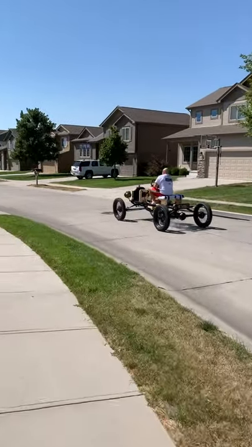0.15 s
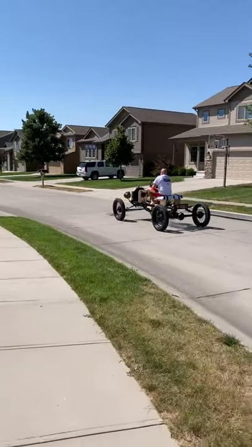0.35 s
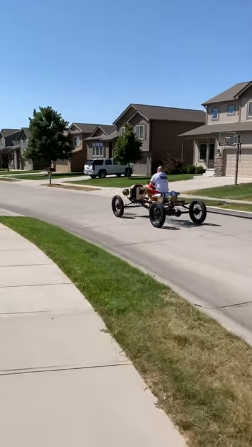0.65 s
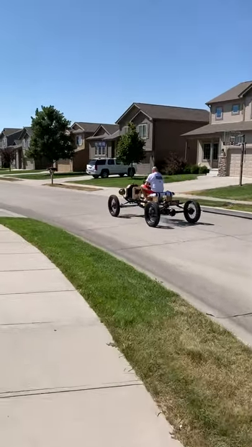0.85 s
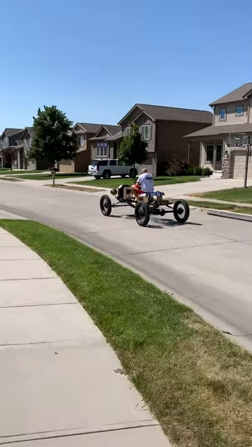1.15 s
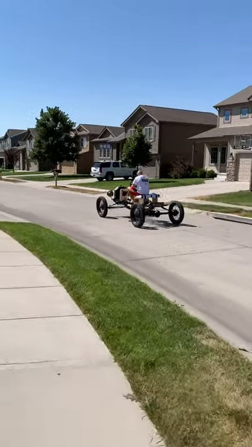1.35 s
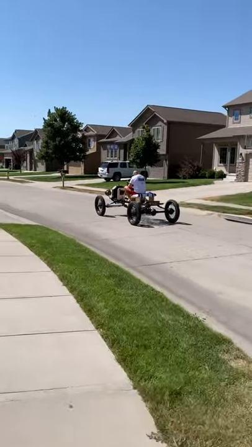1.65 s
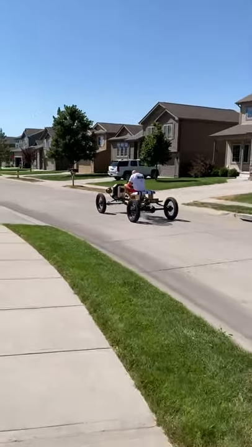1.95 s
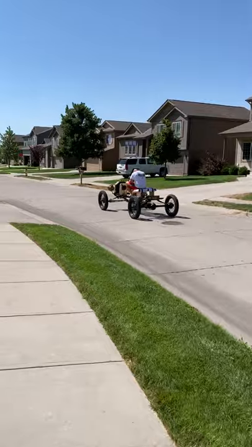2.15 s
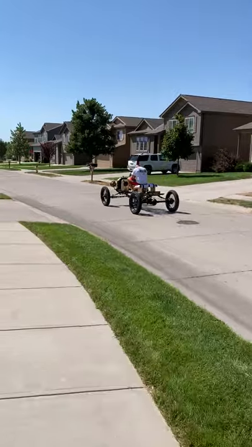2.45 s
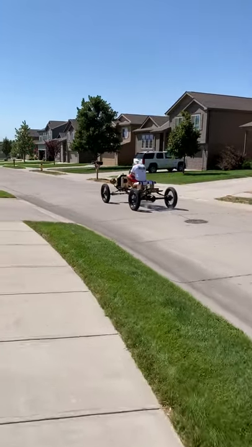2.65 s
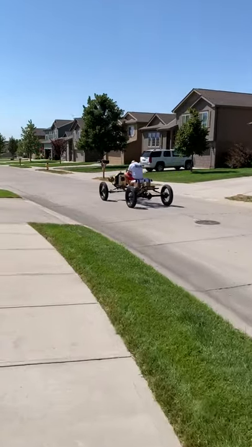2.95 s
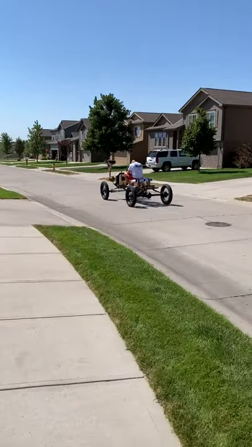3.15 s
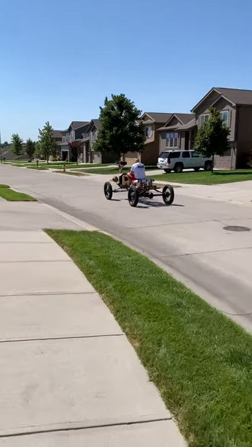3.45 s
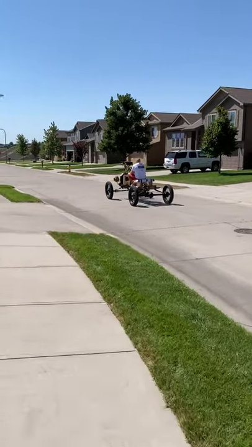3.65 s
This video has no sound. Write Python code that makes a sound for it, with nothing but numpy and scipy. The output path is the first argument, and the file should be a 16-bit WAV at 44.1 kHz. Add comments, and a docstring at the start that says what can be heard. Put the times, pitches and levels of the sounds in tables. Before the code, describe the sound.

From the start to about 3.8 seconds, a small steam car hisses in crisp, sizzling bursts roughly every 0.35 seconds, each sagging and closing abruptly. Quicker hollow, raspy exhaust chuffs run underneath, about six per second. Wind rumbles and thumps, strongest near 0.27, 1.3 and 2.2. Light knocks tap around 1.6, 2.0, 3.4 and 3.55; two faint hums swell near 2.15 and 3.0 over soft distant street noise.

```python
"""On a street pavement, a small steam car drives by the listener, heard through two close microphone ports.
Steam hisses out on every piston stroke: three bands of noise open, sag and shut together.
The exhaust chuffs about four times a turn: puffs of noise ring a pipe and rasp at its mouth.
Wind rumbles and thumps on the microphone as low noise and filtered pushes.
Behind lies a distant street of soft noise; a few light knocks and two faint hums are decaying or swelling tones."""
import sys
import numpy as np
from scipy import signal
from scipy.fft import rfft, irfft, next_fast_len
from scipy.io import wavfile
from scipy.ndimage import uniform_filter1d, map_coordinates

SR = 44100
rng = np.random.default_rng(int(sys.argv[2]) if len(sys.argv) > 2 else 0)


def dump_mix(stems):
    """Bounce the given channels to the path in sys.argv[1] as a 16-bit WAV at rate SR."""
    frames = np.atleast_2d(stems).T  # one column per channel
    limited = np.clip(frames, -1, 1)  # hard clip at full scale
    pcm = np.round(limited * 32767).astype(np.int16)
    wavfile.write(sys.argv[1], SR, pcm)


N = 167139  # length of the scene in samples


def amp(db):
    """Decibels turned into a plain multiplier."""
    return 10 ** (np.asarray(db) / 20)


def unit(x):
    """The same sound scaled to an rms of 1."""
    return x / np.sqrt(np.mean(x ** 2) + 1e-20)


def along(points, hz):
    """Read a curve of (frequency, value) points on a log frequency axis."""
    f, value = np.transpose(points)
    return np.interp(np.log(hz + 1), np.log(f + 1), value)


def curves(rows):
    """Join timed rows with straight lines: one value per sample for each column after the time."""
    times, *columns = np.transpose(rows)
    return [np.interp(np.arange(N) / SR, times, column) for column in columns]


def wobble(rate):
    """A smooth random curve around zero, bending through `rate` random points a second."""
    knots = rng.standard_normal(int(N * rate / SR) + 4)
    return map_coordinates(knots, [np.arange(N) * rate / SR])


def filtered(x, response):
    """Multiply the spectrum of x by a response that depends on frequency."""
    m = next_fast_len(N + SR // 4)  # spare room so the end does not wrap onto the start
    return irfft(rfft(x, m) * response(np.fft.rfftfreq(m, 1 / SR)), m)[..., :N]


def colour(points):
    """The filter response of a (frequency, level) spectrum."""
    return lambda hz: amp(along(points, hz))


def resonances(modes):
    """The combined gain of resonances, each letting sound through near its own frequency."""
    def gain(f):
        total = 0
        for centre, width, db in modes:
            peak = amp(db) * f * width / (centre ** 2 - f ** 2 + 1j * f * width)
            total = total + np.abs(peak) ** 2.5  # sharpens each peak and stretches its dB by 1.25
        return np.sqrt(total)
    return gain


# Likeness of the left and right noise, before the phase difference: (frequency [Hz], likeness [0 to 1])
CHANNEL_LIKENESS = [(300, 1), (430, 1), (560, .85), (720, .75), (950, .9), (1200, .8), (1700, .88),
                    (2400, .6), (3300, .72), (3900, .7), (4350, 1), (5100, 1), (5600, .8), (6400, .99),
                    (7200, .99), (7900, .7), (8600, 1), (9350, 1), (10000, .85), (10900, 1), (11500, .99),
                    (12100, .8), (12700, 1), (13650, 1), (14200, .75), (15000, .98)]
# Phase difference between left and right channels, climbing in steps: (frequency [Hz], phase [rad])
CHANNEL_PHASE = [(0, 0), (700, 0), (1100, -.55), (1400, -.15), (1950, .1), (2350, 1.6), (3400, .5),
                 (3900, 1.3), (4400, 3.05), (5100, 3.2), (6400, 6.25), (7400, 6.35), (8000, 8.1),
                 (8650, 9.35), (9300, 9.5), (10600, 12.5), (11500, 12.6), (12750, 15.65), (13600, 15.8),
                 (14700, 18.8), (16500, 18.85)]


def rush(response, patchy_db):
    """Stereo noise of rms 1 whose patches of time and pitch vary in level, partly shared by left and right."""
    spectrum = signal.stft(rng.standard_normal((2, N)), nperseg=512)[2]
    patches = rng.standard_normal(spectrum.shape[1:])
    patches = uniform_filter1d(patches, size=7, axis=0)  # smooth across frequency
    patches = uniform_filter1d(patches, size=14, axis=1)  # smooth across time
    pair = signal.istft(spectrum * amp(patchy_db * unit(patches)), nperseg=512)[1][:, :N]

    def shared_and_opposed(hz):
        angle = np.arccos(np.clip(along(CHANNEL_LIKENESS, hz), -1, 1)) / 2
        return response(hz) * [np.cos(angle), np.sin(angle)]

    def phase_split(hz):
        phase = np.interp(hz, *np.transpose(CHANNEL_PHASE))
        return np.exp(.5j * np.outer([1, -1], phase))  # half the difference on each channel

    mid, side = filtered(pair, shared_and_opposed)
    return unit(filtered(np.array([mid + side, mid - side]), phase_split))


# Tone of the distant street before its overall level is set: (frequency [Hz], relative level [dB])
STREET_TONE = [(120, -18), (250, 0), (450, 0.5), (700, -3.5), (1500, -2.5), (4000, -16.5), (7800, -6),
               (8100, 1), (11000, -2), (16000, -20)]
STREET_DB, STREET_SWAY_DB = -50.5, 1.2  # middle level and size of its slow sway, dB


def street():
    """The distant background is soft, slowly swaying noise."""
    level = amp(STREET_DB + STREET_SWAY_DB * wobble(8))
    return level * rush(colour(STREET_TONE), patchy_db=3.0)


# Strength of the wind rumble, before a trim and gusts: (time [s], level [dB])
WIND_LEVEL = [(0, -35.5), (.17, -37.5), (.27, -26), (.4, -39), (.7, -35.5), (.85, -38.5), (.93, -42),
              (1.15, -40.5), (1.25, -28.5), (1.47, -34.5), (1.6, -35.5), (1.95, -35.5), (2.15, -39.5),
              (2.48, -35), (2.65, -41), (2.8, -35.5), (3.05, -44), (3.45, -44.5), (3.79, -34.5)]
# Tone of the rumble before its level is set: (frequency [Hz], relative level [dB])
RUMBLE_TONE = [(15, -9), (28, -11), (48, 2), (70, 5), (100, -4.5), (150, -11.5), (250, -21.5), (400, -46),
               (800, -107)]
# Wind thumps on the microphone: (time near the peak [s], peak level [dB], upper edge [Hz])
WIND_THUMPS = [(.09, -35, 214), (.207, -27.5, 216), (0.23, -23, 109), (.252, -22, 327), (0.262, -15, 150),
               (0.275, -22.5, 196), (0.294, -19.5, 241), (0.334, -22.5, 145), (0.353, -27, 236),
               (0.446, -25.5, 85), (.592, -25.5, 167), (0.777, -30.5, 357), (0.802, -27.5, 106),
               (0.856, -30.5, 100), (1.069, -29, 150), (1.204, -24, 130), (1.25, -26, 100),
               (1.284, -30, 163), (1.312, -19, 242), (1.325, -23.5, 243), (1.361, -24.5, 270),
               (1.422, -31.5, 280), (1.428, -20, 148), (1.631, -32.5, 235), (1.7, -28, 320),
               (1.712, -21.5, 230), (1.779, -23.5, 284), (1.789, -18.5, 240), (1.832, -29, 91),
               (1.961, -25, 127), (2.036, -18.5, 152), (2.045, -19.5, 166), (2.081, -24, 158),
               (2.208, -29.5, 240), (2.222, -15, 334), (2.249, -29, 170), (2.366, -25, 102),
               (2.424, -28, 208), (2.464, -24, 197), (2.479, -22, 98), (2.498, -29.5, 232),
               (2.759, -29, 137), (2.896, -27, 260), (3.496, -32, 238), (3.642, -32, 131),
               (3.714, -26, 228), (3.769, -28.5, 139)]
RUMBLE_TRIM_DB, GUST_DB = -0.5, 1.4
THUMP_LOW_HZ = 60.3  # lower edge of every thump
EDDY_DB, EDDY_S = -13.5, 0.013  # eddy strength before a tenfold cut, and fading time


def wind():
    """Moving air presses on the microphone: low rumble and thumps trailed by small eddies, alike in both ears."""
    rumble_db, = curves(WIND_LEVEL)
    rumble = unit(filtered(rng.standard_normal(N), colour(RUMBLE_TONE)))
    out = amp(rumble_db + RUMBLE_TRIM_DB + GUST_DB * wobble(14)) * rumble
    t = np.arange(SR // 6) / SR
    low_cut = signal.butter(4, THUMP_LOW_HZ, 'high', fs=SR, output='sos')
    for time, db, upper_hz in WIND_THUMPS:
        eddies = amp(EDDY_DB) / 10 * np.exp(-t / EDDY_S) * rng.standard_normal(len(t))
        push = (t == 0) + eddies  # one sharp push, then the eddies
        high_cut = signal.butter(5, upper_hz, fs=SR, output='sos')
        thump = signal.sosfilt(np.vstack([low_cut, high_cut]), push)
        thump = amp(db) * thump / np.abs(thump).max()
        at = round((time - .5 / upper_hz) * SR)  # start early, as the filters delay the peak
        out[at:at + len(t)] += thump[:N - at]
    return out


# Faint brief hums: (time of the loudest moment [s], peak level [dB])
HUM_TIMES = [(2.15, -50.5), (2.97, -54)]
HUM_HZ, HUM_S = 473, 0.032  # pitch, and time from the peak to about a third of it


def hums():
    """A weak tone with a slightly unsteady phase swells and fades twice."""
    t = np.arange(N) / SR
    swell = sum(amp(db) * np.exp(-((t - time) / HUM_S) ** 2) for time, db in HUM_TIMES)
    return swell * np.sin(2 * np.pi * HUM_HZ * t + 0.52 * wobble(40))


# Light knocks, t60 being the time to fall by 60 dB, and scuff level being relative to the knock:
# (time [s], level [dB], pitch [Hz], attack [s], t60 [s], scuff level [dB])
LIGHT_KNOCKS = [(1.575, -36, 560, .001, 0.025, -3.5), (1.64, -44, 570, .001, 0.027, -4),
                (1.997, -42, 587, 0.0015, .04, -6), (3.408, -30, 722, 0.0055, 0.056, -12),
                (3.554, -31, 580, 0.0012, 0.046, -1.5)]
# Tones inside each knock: (multiple of the pitch [ratio], relative level [dB])
KNOCK_TONES = [(.86, -7), (1, -3), (1.13, -4), (1.7, -19), (3.1, -16)]
# Tone of the scuff before its level is set: (frequency [Hz], relative level [dB])
SCUFF_TONE = [(100, -25), (350, 7.5), (800, -1), (1700, -3.5), (3000, -16), (6000, -57)]


def knocks():
    """A tap sets off a few tones that die quickly, together with a scuff of noise."""
    out, t = np.zeros(N + SR), np.arange(SR // 6) / SR
    grit = unit(filtered(rng.standard_normal(N), colour(SCUFF_TONE)))
    for time, db, pitch, attack, t60, scuff_db in LIGHT_KNOCKS:
        at = round(time * SR)
        ring = sum(amp(level) * np.sin(2 * np.pi * (pitch * ratio * t + rng.random()))
                   for ratio, level in KNOCK_TONES)
        scuff = amp(scuff_db) * grit[at:at + len(t)]
        fade = amp(db - 60 * t / t60) * (1 - np.exp(-t / attack))
        out[at:at + len(t)] += fade * (ring + scuff)
    return out[:N]


# Exhaust chuffs, added to the flow below: (time [s], pipe ring level [dB], rasp level [dB])
EXHAUST_CHUFFS = [(.075, -45, -62), (.293, -47.5, -42), (0.464, -42, -41), (.62, -50, -54),
                  (.797, -53.5, -45.5), (1, -44, -58), (1.177, -43, -42), (1.335, -57, -58),
                  (1.497, -46, -60), (1.707, -50, -47), (1.871, -40.5, -40.5), (2.035, -70, -71),
                  (2.21, -42.5, -49), (2.399, -45.5, -37), (2.569, -42.5, -36), (2.722, -50.5, -55),
                  (2.89, -49, -46), (3.078, -47.5, -42.5), (3.242, -49.5, -37.5), (3.39, -52.5, -52),
                  (3.559, -50.5, -45.5), (3.753, -64, -42.5)]
# Exhaust flow between the chuffs: (time [s], pipe ring level [dB], rasp level [dB])
EXHAUST_FLOW = [(0, -51, -53), (.8, -54, -51), (1.6, -53, -50.5), (2.4, -55.5, -50), (3.79, -56, -53)]
# Pipe resonances, before the peaks are sharpened: (frequency [Hz], width [Hz], relative level [dB])
PIPE_MODES = [(888, 56, 0), (969, 49, 4), (1310, 98, -10), (1890, 150, -10)]
# Rasp resonances, before the peaks are sharpened: (frequency [Hz], width [Hz], relative level [dB])
RASP_MODES = [(1350, 140, -1.5), (1846, 110, -5), (2253, 133, 3), (2665, 123, -1), (3054, 79, 3),
              (3380, 150, -2), (3730, 250, -2), (4163, 87, 4), (5250, 660, 0), (6980, 1300, -4.5)]
CHUFF_RISE_S, CHUFF_FALL_S, CHUFF_SHAPE = 0.011, 0.011, 1.5  # a higher shape gives a rounder top
PIPE_RISE_PER_S = .025  # the ring drifts upward by this fraction a second as the car drives on
EXHAUST_SWAY_DB, RASP_GRAIN_DB = 1.2, 0.47  # sizes of the random level changes
ROAD_DELAY_S, ROAD_DB = .0047, -15.5  # the bounce off a nearby surface


def exhaust():
    """Short puffs on a gently changing flow ring the pipe and rasp at its mouth."""
    t = np.arange(N) / SR
    power = amp(curves(EXHAUST_FLOW)) ** 2
    for time, *part_db in EXHAUST_CHUFFS:
        distance = np.where(t < time, (time - t) / CHUFF_RISE_S, (t - time) / CHUFF_FALL_S)
        puff = np.exp(-distance ** CHUFF_SHAPE)
        power = power + np.outer(amp(part_db) ** 2, puff)
    ring_level, rasp_level = np.sqrt(power) * amp(EXHAUST_SWAY_DB * wobble(40))
    # reading the noise slower at first and faster later makes its pitch climb
    drift = t + PIPE_RISE_PER_S * t * (t - t[-1]) / 2
    pipe = np.array([np.interp(drift, t, side) for side in rush(resonances(PIPE_MODES), patchy_db=2.95)])
    grain = amp(RASP_GRAIN_DB * wobble(300))
    return ring_level * pipe + rasp_level * grain * rush(resonances(RASP_MODES), patchy_db=3)


def road_bounce(x):
    """A nearby surface returns one weaker, later copy of the exhaust."""
    return filtered(x, lambda hz: 1 + amp(ROAD_DB) * np.exp(-2j * np.pi * hz * ROAD_DELAY_S))


# Piston strokes that leak steam; the three levels hold before the sag and flutter:
# (start [s], length [s], sag [dB per s], hiss level [dB], sizzle level [dB], top fizz level [dB])
PISTON_STROKES = [(0.005, 0.25, 7, -45.5, -31.5, -51), (.39, .25, 30, -39, -30, -31),
                  (.735, 0.23, 8, -42, -33, -35), (1.11, 0.31, 23.5, -44, -31, -43),
                  (1.44, 0.23, 6, -48, -32.5, -30), (1.805, 0.244, 25.5, -40.5, -33, -43),
                  (2.135, 0.23, 18, -38.5, -31, -38), (2.495, 0.244, 16, -43, -33, -38),
                  (2.815, 0.23, 25.5, -44.5, -32, -39), (3.175, 0.24, 49, -40, -35, -42),
                  (3.495, 0.23, 5.5, -42, -36, -37)]
# Tone of the hiss before its level is set: (frequency [Hz], relative level [dB])
HISS_TONE = [(1500, -9.5), (2500, -6.5), (4000, -4.5), (5600, 3), (7800, -0.5), (9000, 5.5), (11000, -9)]
# Tone of the sizzle before its level is set: (frequency [Hz], relative level [dB])
SIZZLE_TONE = [(5000, -72), (7800, -14.5), (8050, -0.5), (10200, 1.5), (11500, -0.5), (13000, -2),
               (16000, -7)]
# Tone of the top fizz before its level is set: (frequency [Hz], relative level [dB])
FIZZ_TONE = [(8000, -41), (10500, -43), (12500, -9), (13500, 3), (14600, -7), (15600, 3.5)]
ATTACK_S, RELEASE_DB_PER_S = 0.05, 287
CLOSING_S = 0.019  # the valve eases into closing
SEEP_DB, SEEP_S = -12.5, 0.19  # steam still seeps between the two strokes of a turn
STEAM_PATCHY_DB, JET_SWAY_DB = .9, 1


def steam():
    """Each stroke opens the leak, sags as the steam expands and shuts; every second one seeps on for a while."""
    t, level = np.arange(N) / SR, np.zeros((3, N))

    def shut(age, close_s):
        late = np.maximum(age - close_s, 0)
        return amp(-RELEASE_DB_PER_S * (np.hypot(late, CLOSING_S) - CLOSING_S))

    for k, (start, length, sag, *band_db) in enumerate(PISTON_STROKES):
        age = t - start + ATTACK_S / 5  # the leak opens slightly before the listed start
        gate = amp(-sag * np.clip(age, 0, length)) * shut(age, length)
        if k % 2:
            gate = np.maximum(gate, amp(SEEP_DB) * shut(age, length + SEEP_S))
        opening = np.clip(age / ATTACK_S, 0, 1)
        level = np.maximum(level, np.outer(amp(band_db), gate * opening))
    flutter_db = 1.4 * wobble(35) + .5 * wobble(200)  # shared by all three bands
    out = 0
    for band_level, tone in zip(level, (HISS_TONE, SIZZLE_TONE, FIZZ_TONE)):
        sway = amp(flutter_db + JET_SWAY_DB * wobble(21.94))
        out = out + band_level * sway * rush(colour(tone), STEAM_PATCHY_DB)
    return out


REFLECTION_DB = -20


def reflections(x):
    """Weak copies off the chassis, kerb and road colour the steam with a fine ripple."""
    delays = rng.uniform(0.0016, .028, 10)  # seconds
    signs = rng.choice([-1, 1], 10)
    out = x.copy()
    for delay, sign in zip(delays, signs):
        lag = max(1, round(delay * SR))
        out[:, lag:] += sign * amp(REFLECTION_DB) * x[:, :-lag]
    return out


def scene():
    """The distant street, the wind, the small sounds nearby, and the car with its reflections."""
    background = street() + wind()
    nearby = hums() + knocks()
    car = road_bounce(exhaust()) + reflections(steam())
    return background + nearby + car


TOP_HZ = 15850


def record(dry):
    """Nothing above the band limit is kept."""
    return filtered(dry, lambda hz: hz < TOP_HZ)


dry = scene()
out = record(dry)
dump_mix(out)
```